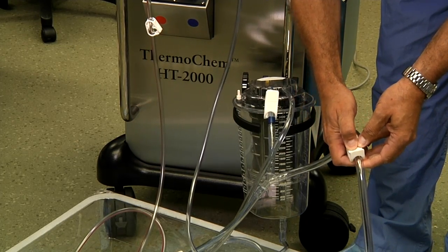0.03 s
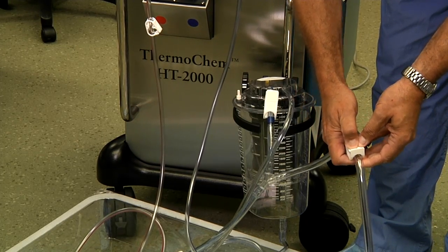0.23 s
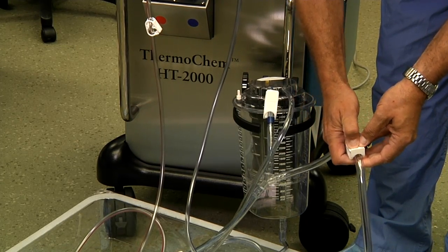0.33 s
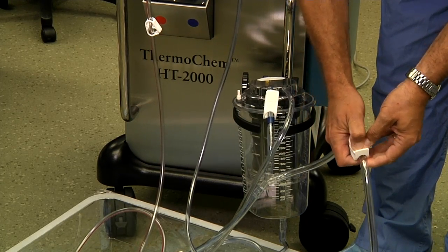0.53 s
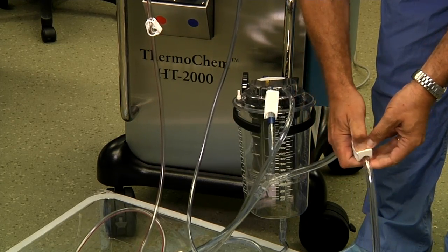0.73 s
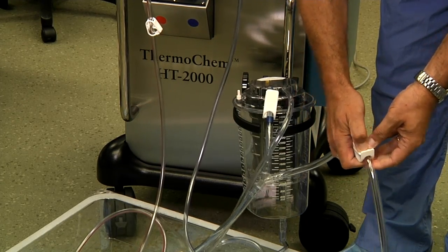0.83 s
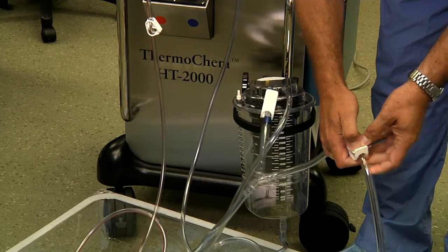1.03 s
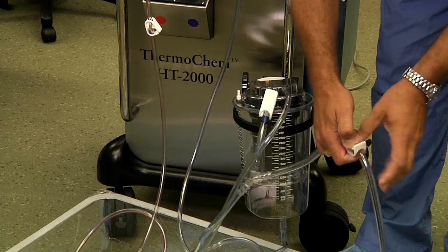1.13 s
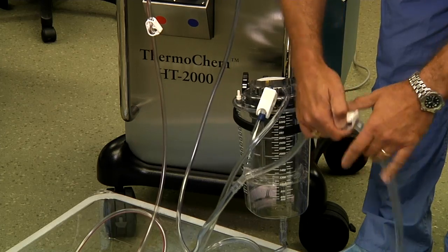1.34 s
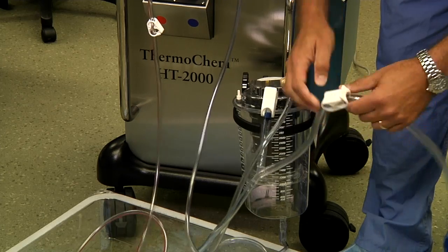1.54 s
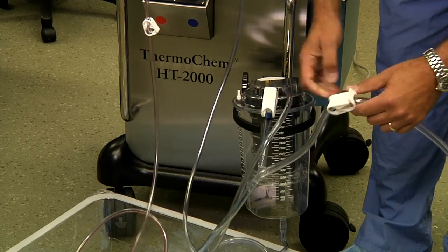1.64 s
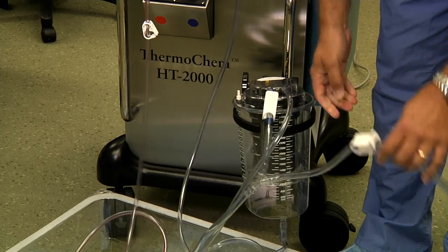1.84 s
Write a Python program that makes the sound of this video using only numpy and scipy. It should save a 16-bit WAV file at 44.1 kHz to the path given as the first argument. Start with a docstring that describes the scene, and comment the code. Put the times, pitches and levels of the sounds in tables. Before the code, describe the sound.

Five sharp plastic clamp clicks, followed by soft tubing handling, with quiet equipment humming.

```python
"""Equipment hums low from start to end, while a plastic ratchet clamp is squeezed shut on soft tubing.
Its catch (the pawl) snaps over one tooth after another, ringing lower as the clamp tightens.
A fast limiter flattens the snaps, and a small hard room answers each one.
Then the hands shift with a rustle, and the tubing slides, ticks and bumps."""
import sys
import numpy as np
from scipy import signal
from scipy.fft import rfft, irfft
from scipy.io import wavfile
from scipy.ndimage import uniform_filter1d, minimum_filter1d

SR = 44100
rng = np.random.default_rng(int(sys.argv[2]) if len(sys.argv) > 2 else 0)


def file_out(sig):
    """Save sig as 16-bit WAV at sys.argv[1]."""
    # one column per channel
    cols = np.atleast_2d(sig).T
    # limit, then scale
    lim = np.clip(cols, -1, 1)
    pcm = np.round(lim * 32767).astype(np.int16)
    wavfile.write(sys.argv[1], SR, pcm)


N = 83790
LEAD = int(0.2 * SR)  # samples before t = 0, so an earlier snap still echoes at the start


def undb(db):
    """Turn decibels into a plain gain."""
    return 10 ** (np.asarray(db) / 20)


def unit(x):
    """Scale to an average (rms) level of 1."""
    return x / np.sqrt(np.mean(x ** 2))


def fade(t, t60):
    """Start at t = 0 and die away by 60 dB every t60 seconds."""
    return (t >= 0) * np.exp(-np.log(1000) * np.maximum(t, 0) / t60)


def ring(t, hz, db, t60, wave=np.sin):
    """One dying tone of a struck object."""
    return undb(db) * fade(t, t60) * wave(2 * np.pi * hz * t)


def on_log_axis(hz, points):
    """Read a curve of (f/Hz, value) points at any frequency."""
    f, values = np.array(points).T
    return np.interp(np.log(np.maximum(hz, 1)), np.log(f), values)


def noise(points):
    """Noise shaped by (f/Hz, level/dB) points."""
    gain = undb(on_log_axis(np.fft.rfftfreq(N, 1 / SR), points))
    return irfft(rfft(rng.standard_normal(N)) * gain, N)


def resonant_noise(hz, width_hz):
    """Noise gathered around one pitch, at level 1."""
    f = np.fft.rfftfreq(N, 1 / SR)
    resonance = f * width_hz / (hz ** 2 - f ** 2 + 1j * f * width_hz)
    return unit(irfft(rfft(rng.standard_normal(N)) * resonance ** 2, N))


def wander(rate_hz):
    """A smooth random drift, about 1 in size."""
    span = max(int(SR / rate_hz), 1)
    drift = uniform_filter1d(rng.standard_normal(N), span, mode="wrap")
    return unit(uniform_filter1d(drift, span, mode="wrap"))


def equipment(t):
    """Fan noise with faint hum tones that waver in loudness and pitch."""
    # moving air: f/Hz, relative level/dB
    air_spectrum = [(15, -46), (25, -27.5), (76, -14.5), (114, -16.5), (137, -9.5), (175, -10), (293, -3.5),
                    (394, -7), (463, -10.5), (591, -11.5), (796, -14), (988, -18.5), (1520, -18),
                    (1790, -23), (12500, -44.5), (16000, -69)]
    # hum tones: f/Hz, level/dB
    hum_tones = [(145, -75.5), (199, -76), (297, -84.5), (316, -70), (339, -88.5), (527, -76.5), (581, -76)]
    waver, waver_hz = 0.43, 7
    hum = 0
    for hz, db in hum_tones:
        level = undb(db) * np.sqrt(2) * (1 + waver * wander(waver_hz))
        hum += level * np.sin(2 * np.pi * hz * t + waver * wander(waver_hz))
    return undb(-60) * unit(noise(air_spectrum)) + hum


def snap_ahead(t, body_hz, body_db, arm_hz, arm_db, pawl_hz, pawl_db, frame_db, crack_db, push_db):
    """The pawl drops over a tooth: a push of air, a crack and a short plastic ring."""
    # tones of the clamp's frame, the same for every tooth: f/Hz, relative level/dB, t60/s
    frame_tones = [(714, -46, 0.0058), (1750, -26, 0.0049), (2800, -20, 0.0076), (4720, -35.5, .005),
                   (6100, -22, .005), (8800, -18.5, 0.0054), (10090, -9.5, .004), (10945, -9.5, 0.0027),
                   (12940, -10, 0.0025), (14000, -20.5, .004), (15400, -26.5, .004)]
    tooth = (ring(t, body_hz, body_db, t60=0.0055)
             + ring(t, arm_hz, arm_db, t60=0.0033)
             + ring(t, pawl_hz, pawl_db, t60=0.004))
    frame = undb(frame_db) * sum((-1) ** k * ring(t, *tone) for k, tone in enumerate(frame_tones))
    crack = undb(crack_db) * fade(t, t60=0.0038) * rng.standard_normal(len(t))
    push = undb(push_db) * np.exp(-(t / 0.000088) ** 2)
    return tooth - frame + crack - push


def snap_sideways(t, tension, body_hz, arm_hz, body_db, arm_db, pawl_hz, pawl_db, crack_db):
    """Sideways the snap is briefer and less pitched; a tighter squeeze makes it ring longer."""
    tones = [(body_hz, body_db, 0.0015), (arm_hz, arm_db, 0.0019), (pawl_hz, pawl_db, 0.0011)]
    ringing = sum(ring(t, hz, db, t60 * tension, wave=np.cos) for hz, db, t60 in tones)
    crack = undb(crack_db) * (t == 0)
    return crack + np.heaviside(t, 0.5) / tension * ringing


def clamp():
    """One snap per tooth: row 0 goes straight to the listener, row 1 into the room."""
    # snaps: t/s, body f/Hz, level/dB, arm f/Hz, level/dB, pawl f/Hz, level/dB,
    # frame level/dB, crack level/dB, push level/dB;
    # then sideways: body level/dB, arm level/dB, pawl f/Hz, level/dB, crack level/dB
    snaps = [(-.075, 3730, -25, 7200, 14.5, 7900, 9, -18.5, -12, -12, -5, -17.5, 8000, -1.5, -2),
             (.0745, 3750, -31.5, 6940, 2, 8100, 1, -0.5, -14.5, -15, -7, -11, 8100, -2, -2.5),
             (.1736, 3400, -31, 7040, 1.5, 8220, 3, -4, -16.5, -10.5, -5, -14, 7970, 1.5, -6),
             (.2906, 3200, -14.5, 6930, 4, 9000, 3.5, 3.5, -7.5, -8.5, -2.5, -10, 8170, 2.5, -2),
             (0.4429, 3500, -11.5, 6180, 1.5, 8570, -0.5, 1.5, -13, -12, -1.5, -10.5, 8620, -2, -3.5),
             (0.5876, 2800, -11, 6064, 2, 6950, 0, -1.5, -24, -9.5, -11.5, -5.5, 8700, -3.5, 2)]
    span = np.arange(-64, 1024)  # samples around a snap
    t = span / SR
    out = np.zeros((2, LEAD + N))
    for start, *tooth in snaps:
        where = LEAD + round(start * SR) + span
        tension = 1 + 1.05 * start
        body_hz, arm_hz = tooth[0], tooth[2]
        out[0, where] += snap_ahead(t, *tooth[:9])
        out[1, where] += snap_sideways(t, tension, body_hz, arm_hz, *tooth[9:])
    # the clamp is too small to give off bass
    return signal.sosfilt(signal.butter(2, 182, "high", fs=SR, output="sos"), out)


def room(x):
    """Sound bounces off things nearby, echoes a few times and leaves a tail whose treble dies first."""
    # tone of the bounced sound: f/Hz, relative level/dB
    colour = [(200, -20.5), (1000, -3), (2100, -8.5), (2650, -1.5), (3300, 1), (4200, 0.5), (5700, 4.5),
              (7000, 0.5), (8200, 4.5), (9600, 1), (11200, 6), (12400, 3.5), (13400, -2.5), (15500, -0.5)]
    # how long the tail lasts: f/Hz, t60/s
    decay_times = [(300, .6), (3000, 0.73), (6000, 0.54), (9000, 0.42), (12000, 0.3), (15000, 0.27)]
    # distinct echoes: delay/s, level/dB
    echoes = [(.0036, -26.5), (.0046, -31), (.0088, -31.5), (.011, -37.5), (.0194, -34.5), (.0254, -32.5),
              (.03, -32.5)]
    t, f = np.arange(N) / SR, np.fft.rfftfreq(N, 1 / SR)
    spectrum = rfft(noise(colour))
    edges_hz = np.arange(0, 17000, 600)
    tail = 0
    for low, high in zip(edges_hz, edges_hz[1:]):
        band = irfft(spectrum * ((f >= low) & (f < high)), N)
        tail += band * fade(t, on_log_axis((low + high) / 2, decay_times))
    nearby = noise(colour) * fade(t, t60=0.041)
    response = undb(-48.5) * tail + undb(-36.5) * nearby
    for delay, db in echoes:
        response[int(delay * SR)] += undb(db)
    return signal.fftconvolve(x, response)[:len(x)]


def rustle(t):
    """Moving arms make a soft noise that swells near the end."""
    # tone of the rustle: f/Hz, relative level/dB
    colour = [(20, -39.5), (70, -16), (150, 0), (320, 7.5), (700, -1.5), (1600, -9.5), (3000, -17),
              (6000, -29.5), (15000, -38)]
    # its swell: t/s, level/dB
    swell = [(1.3, -84), (1.38, -63), (1.52, -62), (1.62, -58.5), (1.72, -57.5), (1.88, -53.5)]
    times, levels_db = np.array(swell).T
    return unit(noise(colour)) * undb(np.interp(t, times, levels_db))


def rubs(t):
    """Fingers and tubing slide, each stroke a slightly rough hiss."""
    # strokes: t/s, rise/s, hold/s, fall/s, level/dB, f/Hz, width/Hz
    strokes = [(1.315, 0.0088, 0.0055, .025, -79, 7620, 1464), (1.38, 0.06, .12, 0.068, -81.5, 8400, 5000),
               (1.545, 0.016, 0.02, 0.021, -65.5, 8220, 2610),
               (1.555, 0.01, .012, 0.013, -74.5, 12000, 6000),
               (1.52, 0.011, .006, 0.0066, -72.5, 4720, 302), (1.53, 0.14, .28, 0.12, -71, 4650, 1420),
               (1.675, 0.022, 0.054, 0.036, -79, 6050, 5000)]
    roughness = undb(wander(150))  # the level flutters by about 1 dB
    out = np.zeros(N)
    for start, rise, hold, fall, db, hz, width_hz in strokes:
        stroke = np.interp(t, start + np.cumsum([0, rise, hold, fall]), [0, 1, 1, 0])
        out += undb(db) * stroke * roughness * resonant_noise(hz, width_hz)
    return out


def ticks(t):
    """Clamp and tubing knock lightly in the hands; harder knocks have more contact noise."""
    # knocks: t/s, level/dB, f/Hz, hardness/dB
    knocks = [(1.3653, -65.5, 2740, -7), (1.3724, -60.5, 2700, -8), (1.4254, -52, 3500, -3),
              (1.858, -47.5, 3440, 7), (1.864, -53, 1700, 10)]
    # contact noise: f/Hz, relative level/dB
    contact = [(100, -0.5), (1500, 4), (4000, -12), (6500, -21), (11000, -19.5), (16000, -41)]
    attack_s = 0.0014
    out = np.zeros(N)
    for start, db, hz, hard_db in knocks:
        tick = resonant_noise(hz, width_hz=800) + undb(hard_db) * unit(noise(contact))
        onset = 1 - np.exp(-abs(t - start) / attack_s)
        out += undb(db) * onset * fade(t - start, t60=0.029) * tick
    return out


def bumps(t):
    """The swinging tubing bumps dully, tuned a little differently each time."""
    # bumps: t/s, level/dB
    hits = [(1.371, -43.5), (1.382, -54), (1.415, -44), (1.44, -51), (1.691, -51), (1.809, -48),
            (1.868, -42)]
    # tones of a bump: f/Hz, relative level/dB, t60/s
    tones = [(200.6, -12.5, 0.52), (285.3, -9, 0.6), (316, -5, .25), (380.3, -7, .16), (516, -10, 0.11)]
    attack_s, pitch_spread = 0.0023, 0.0304
    out = np.zeros(N)
    for start, db in hits:
        onset = 1 - np.exp(-abs(t - start) / attack_s)
        for hz, tone_db, t60 in tones:
            detune = 1 + pitch_spread * rng.standard_normal()
            out += undb(db) * onset * ring(t - start, hz * detune, tone_db, t60)
    return out


def scene():
    """Clamp and hands in the room, over the hum."""
    t = np.arange(N) / SR
    snaps = clamp()
    hands = rustle(t) + ticks(t) + bumps(t) + rubs(t)
    ahead, sideways = snaps + np.pad(hands, (LEAD, 0))
    in_room = ahead + room(sideways)
    return (in_room[LEAD:] + equipment(t))[None]


def record(dry):
    """A fast limiter turns the level down just ahead of each peak; deep bass and top treble are cut."""
    ceiling_db, limiter_s = -3.5, 0.00042
    span = int(limiter_s * SR)
    overshoot = np.maximum(abs(signal.hilbert(dry[0])) / undb(ceiling_db), 1)
    wanted_gain = minimum_filter1d(1 / overshoot, span)
    bell = signal.windows.hann(2 * span + 1)
    smooth_gain = 1 - np.convolve(1 - wanted_gain, bell / bell.sum(), "same")
    bass_cut = signal.butter(1, 60, "high", fs=SR, output="sos")
    treble_cut = signal.ellip(8, 0.2, 70, 15900, fs=SR, output="sos")
    return signal.sosfilt(treble_cut, signal.sosfilt(bass_cut, dry * smooth_gain))


dry = scene()
out = record(dry)
file_out(out)
```